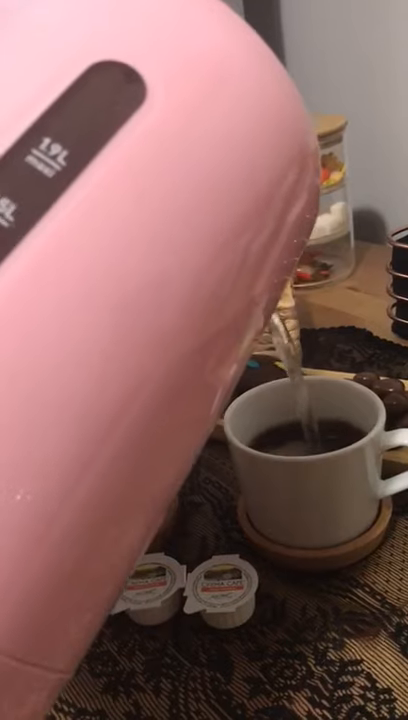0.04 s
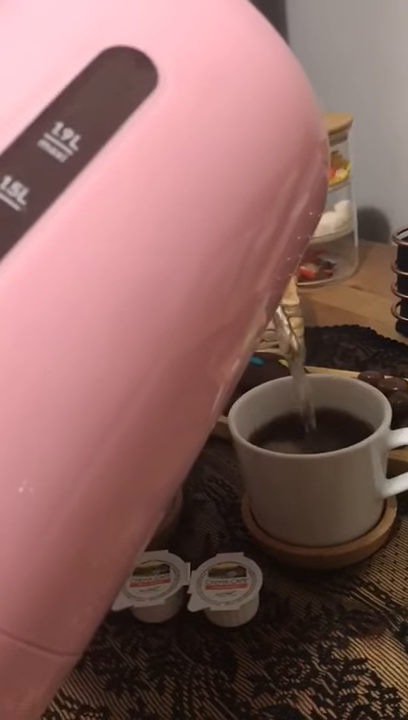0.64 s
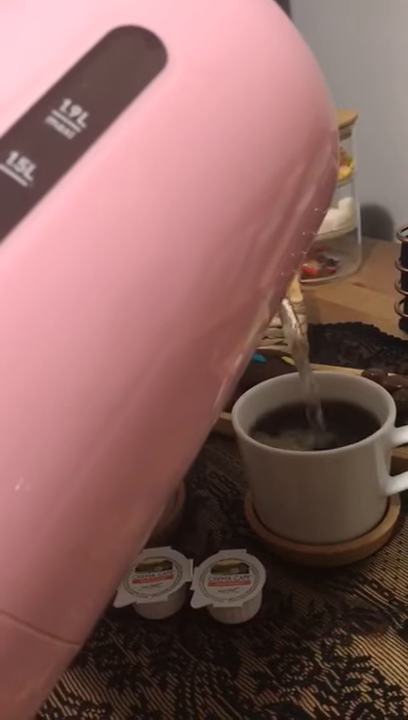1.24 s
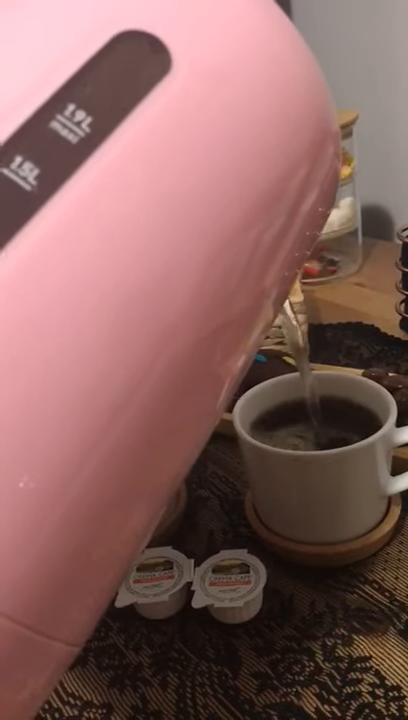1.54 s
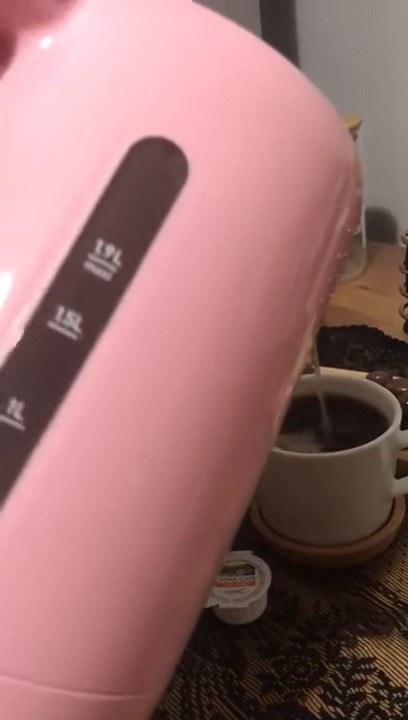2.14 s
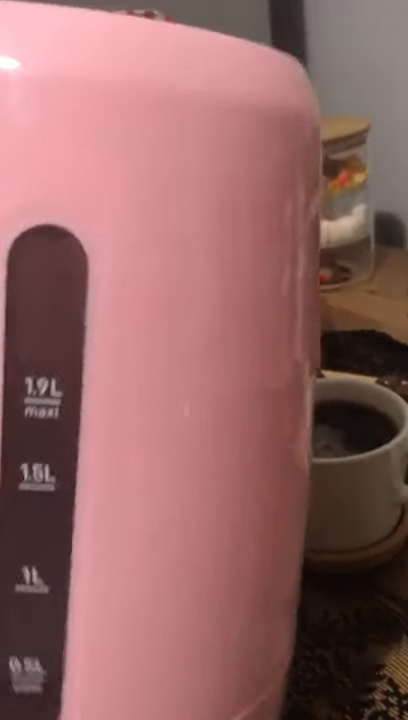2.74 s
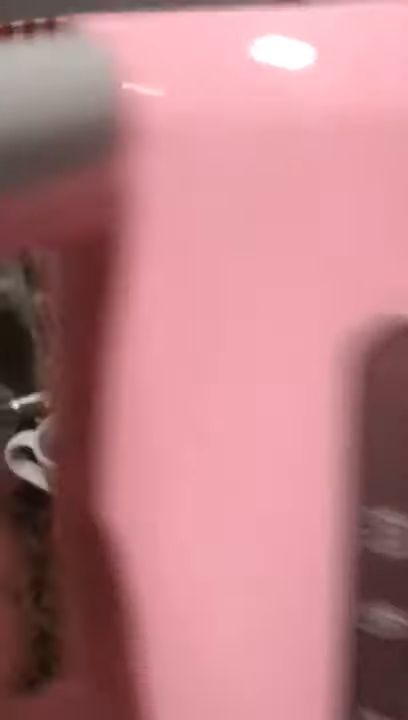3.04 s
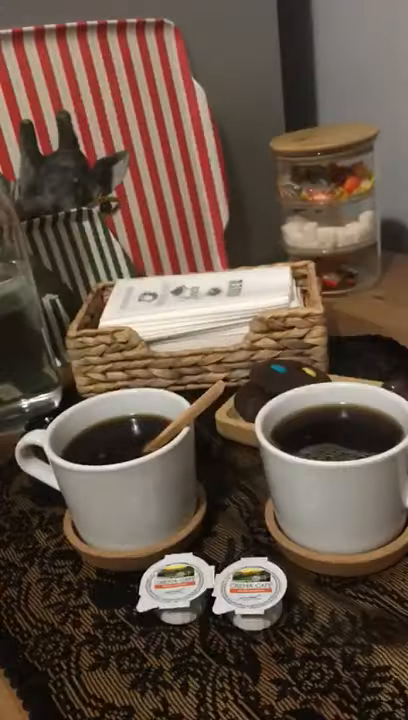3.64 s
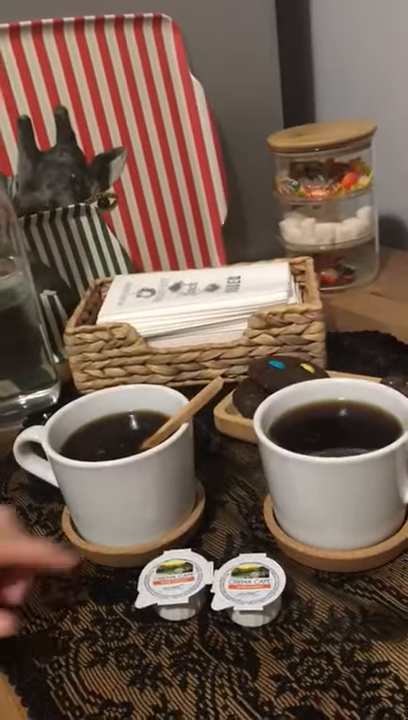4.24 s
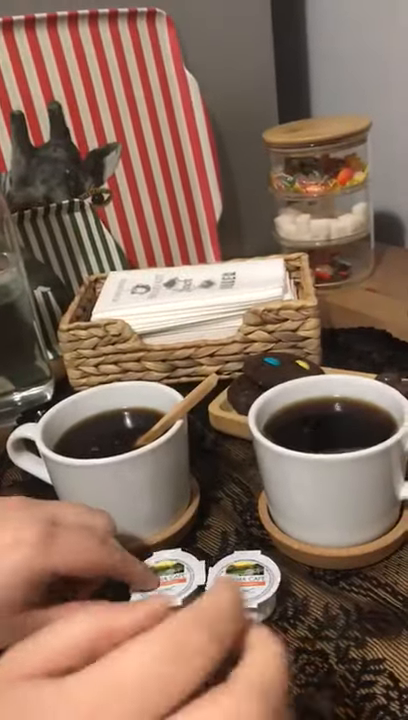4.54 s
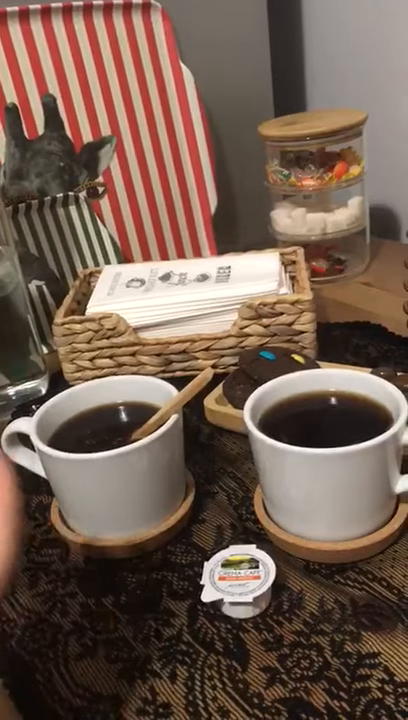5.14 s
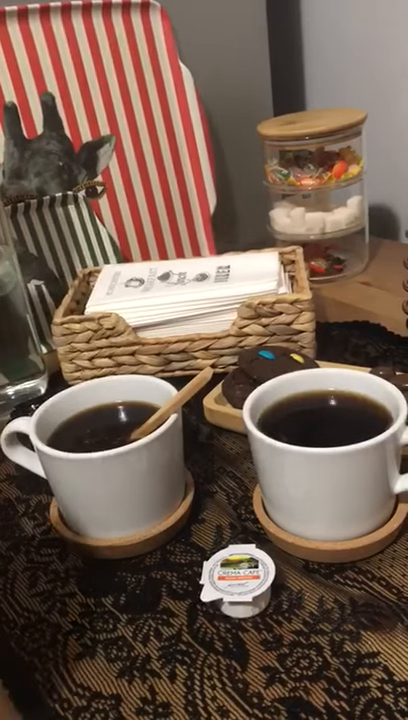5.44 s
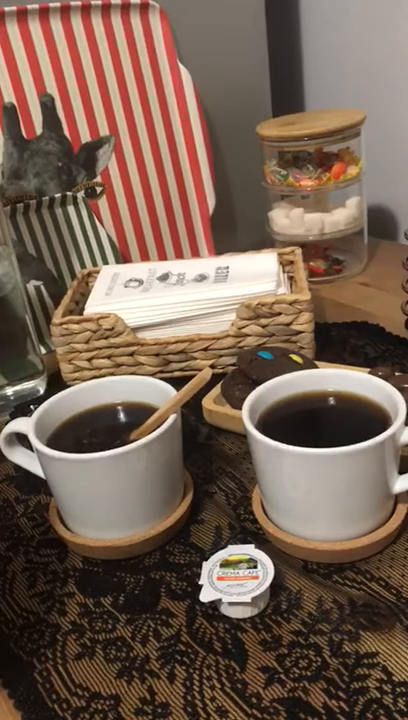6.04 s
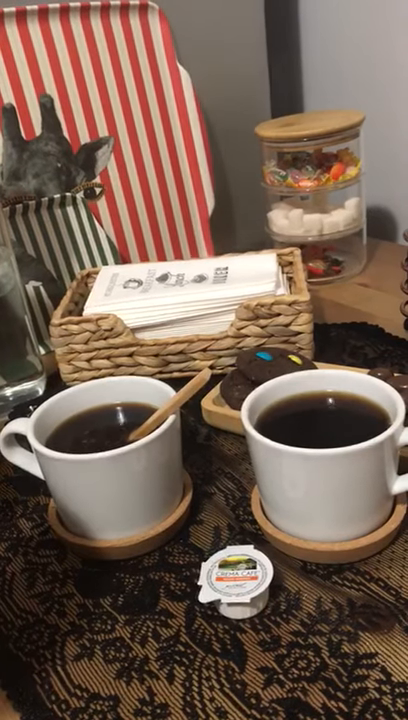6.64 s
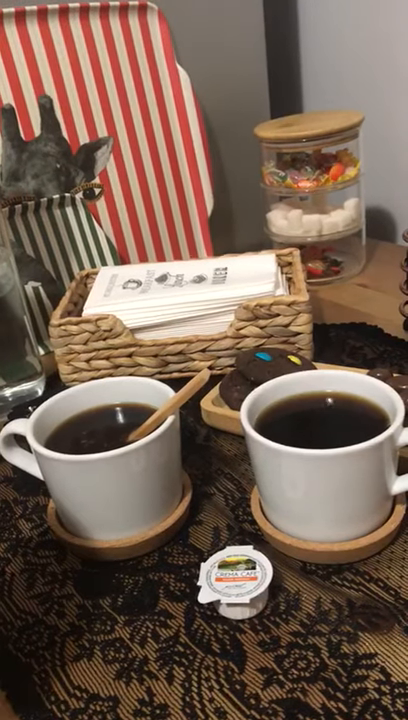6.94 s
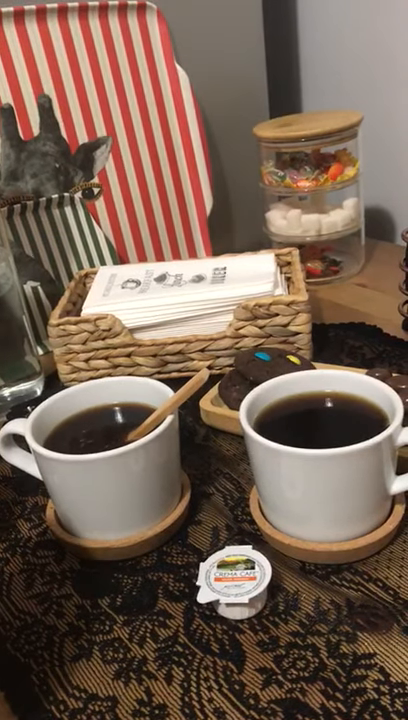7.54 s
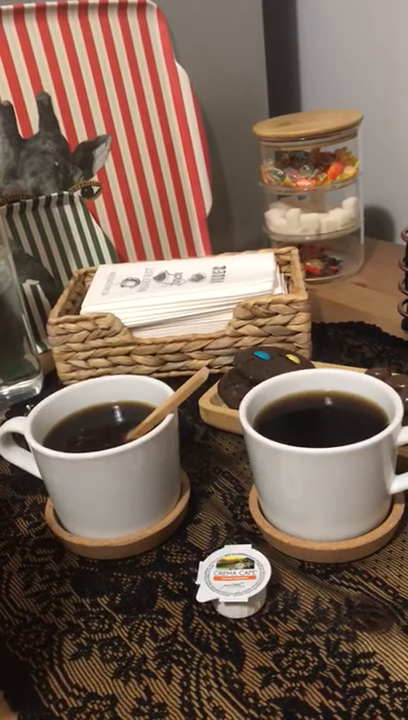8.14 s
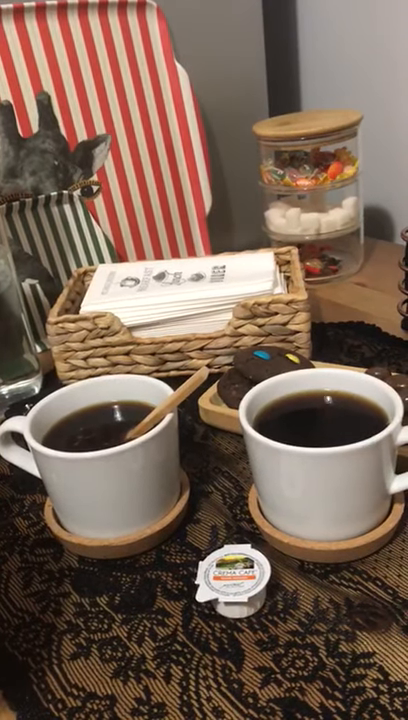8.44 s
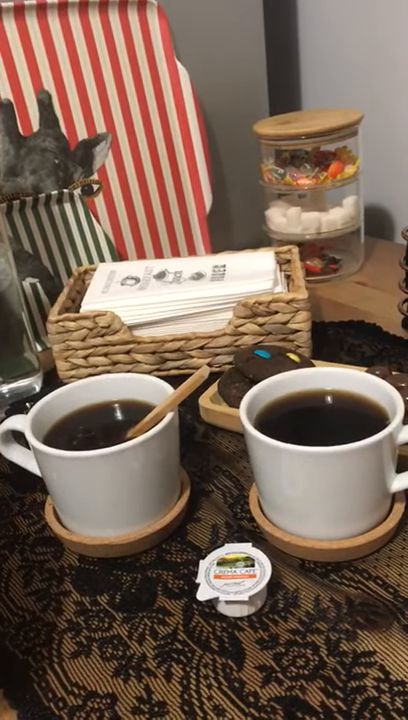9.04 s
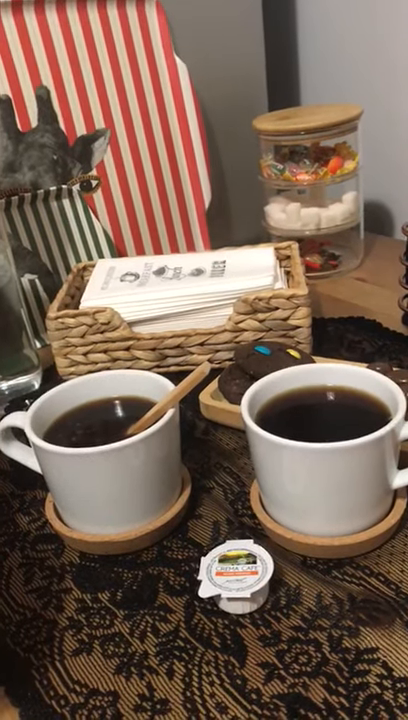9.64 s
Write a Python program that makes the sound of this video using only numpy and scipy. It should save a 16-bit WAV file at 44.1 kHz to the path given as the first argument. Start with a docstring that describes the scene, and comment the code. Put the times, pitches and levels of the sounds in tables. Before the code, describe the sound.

In a small kitchen where a fridge hums faintly, a close stream of water splats and plops into a ceramic mug. After it ends, a kettle lands on a wooden table with a thud and a second knock, and sleeves swish. Fingers then handle a small plastic creamer cup: a bright crack as the tab breaks, a crackly peel of foil, and a few fading ticks and rubs.

```python
"""Hot water runs from a kettle into a nearly full ceramic mug: it splats, plops and traps ringing bubbles.
The kettle is set down with a thud that makes the wooden table ring, and sleeves rustle.
A little plastic creamer cup is picked up and its tab is snapped. The foil lid peels back as its glue
lets go in tiny snaps, and fingers rub, creak and click on the hollow cup.
Behind it all, a fridge hums in the small kitchen."""
import sys
import numpy as np
from scipy import signal
from scipy.fft import rfft, irfft
from scipy.io import wavfile

SR = 44100
rng = np.random.default_rng(int(sys.argv[2]) if len(sys.argv) > 2 else 0)


def digitize_waveform(pressure):
    """Quantize a signal to 16-bit integers and store it at the path in sys.argv[1].

    Rows of a 2-D input are taken as channels; values are limited to [-1, 1].
    """
    field = np.atleast_2d(pressure).T
    bounded = np.clip(field, -1, 1)
    quanta = np.round(bounded * 32767).astype(np.int16)
    wavfile.write(sys.argv[1], SR, quanta)


N = 431738
TIME = np.arange(N) / SR  # seconds through the whole scene
BURST = np.arange(2048) / SR  # seconds through one short sound

# Levels in the tables are relative: the functions turn them up or down.
# The fridge's hum. Each row: pitch in Hz, level in dB.
FRIDGE_TONES = [(48.4, -65), (96.9, -67), (145.3, -60.5), (220.7, -68.5), (290.7, -71.5), (339.1, -72.5),
                (549.1, -75.5)]
# The tone colour of the room noise. Each row: frequency in Hz, level in dB.
ROOM_COLOUR = [(20, -26.5), (45, -1), (145, -3.5), (243, -10.5), (331, -10.5), (418, -18.5), (555, -15.5),
               (817, -23.5), (2820, -31), (8580, -34.5), (11100, -37.5), (12000, -48.5)]
# Faint hiss and appliance whine. Each row: pitch in Hz, width in Hz, level in dB.
HISS_BANDS = [(550, 150, -7), (3640, 11, 16), (4410, 67, 8), (6550, 450, -1.5)]
# The kitchen's echo. Each row: frequency in Hz, seconds to fade by 60 dB.
ECHO_TIMES = [(100, 0.9), (500, 0.44), (5000, 0.29), (12000, 0.25)]

# Sleeves swish most as the arm lets go of the kettle. Each row: time in seconds, level in dB.
SLEEVE_LEVELS = [(3.1, -86), (3.2, -66.5), (3.36, -62), (3.5, -66), (3.86, -59.5), (3.92, -46), (3.99, -49),
                 (4.06, -59), (4.26, -60.5), (4.45, -64), (4.61, -66), (4.82, -64.5), (4.88, -83)]
# An arm brushes the tablecloth. Each row: start in seconds, length in seconds, level in dB.
ARM_BRUSHES = [(5.05, 0.26, -59)]
# The tone colours of sleeves, tablecloth and kettle shell. Each row: frequency in Hz, level in dB.
SLEEVE_COLOUR = [(300, -23), (700, -0.5), (1350, 0), (9000, -6.5), (12000, -12)]
TABLECLOTH_COLOUR = [(100, -4), (200, 4), (800, -17), (5000, -29), (12000, -39.5)]
SHELL_COLOUR = [(500, -17), (1100, 0), (2400, -1), (10000, -26.5)]
# Kettle and hands hit the table. Each row: time in seconds, thud level in dB, thud pitch in Hz,
# clack level in dB, tick level in dB.
TABLE_BLOWS = [(2.376, -62, 130, -70, -58.5), (2.542, -47, 120, -70, -47.5), (3.276, -62, 130, -56, -51),
               (3.723, -22.5, 80, -25, -37.5), (3.979, -27.5, 90, -42, -39.5),
               (4.144, -41.5, 188, -65, -53.5), (4.691, -43.5, 138, -56, -57),
               (5.09, -43.5, 156, -49.5, -65)]
# How the table, the squeak and the scrape ring. Each row: pitch in Hz, width in Hz, level in dB.
TABLE_RINGS = [(45, 7, 7), (80, 13.5, 3), (109.9, 7.8, 15), (187.6, 16, 5.5), (274, 38, 10), (390, 71, 6.5),
               (686, 62, 6)]
SQUEAK_RINGS = [(7300, 120, -1), (8600, 140, 7), (10860, 230, 6)]
SCRAPE_RINGS = [(1300, 630, 0)]
# The kettle's foot slides as it settles. Each row: start in seconds, length in seconds, level in dB.
FOOT_SQUEAKS = [(3.76, 0.22, -60.5)]
FOOT_SCRAPES = [(3.81, 0.08, -56)]

# How the plastic cup's wall rings. Each row: pitch in Hz, width in Hz, level in dB.
CUP_RINGS = [(1510, 370, 5.5), (2200, 288, 2.5), (3260, 330, 4), (4370, 290, 1), (5910, 340, 3),
             (6870, 220, -0.5), (7940, 700, -11.5), (9500, 650, -3.5), (10950, 1200, -6.5)]
# The wall buckles. Each row: time in seconds, click level in dB, crack level in dB, crack pitch in Hz,
# pop level in dB, pop pitch in Hz.
CUP_BUCKLES = [(4.494, -60, -48, 5000, -46, 1250), (4.692, -60, -41.5, 6600, -41, 1266),
               (5.857, -38, -27, 5930, -39, 1180), (6.0826, -26, -34, 8950, -31.5, 1010),
               (6.0841, -16.5, -7.5, 6440, -27.5, 1456), (6.15, -38.5, -47, 6000, -37.5, 1170),
               (6.2446, -31.5, -31.5, 9800, -32.5, 1277), (6.422, -40.5, -44, 6500, -41.5, 1330),
               (6.4293, -58, -62, 6460, -41, 1044), (7.8304, -52, -63, 4110, -52.5, 1066),
               (8.0941, -65, -70, 3000, -48, 1220), (9.048, -44.5, -37, 4490, -53, 1310)]
# Fingernails tap or spots of glue let go. Each row: time in seconds, level in dB, pitch in Hz.
CUP_TICKS = [(4.6638, -43.5, 6300), (6.8213, -32.5, 7000), (6.967, -40, 6250), (7.0248, -36, 7400),
             (7.0632, -39, 7020), (7.122, -40.5, 7500), (7.358, -41, 8900), (7.4623, -39.5, 6810),
             (7.4923, -36, 5000), (7.6987, -41, 7300), (7.73, -42.5, 4840), (7.777, -40.5, 5400),
             (7.9276, -41, 5900), (7.995, -43, 7500), (8.1707, -44.5, 3500), (8.764, -52.5, 4590),
             (9.5776, -55, 5000)]
# Fingers slide, grip and pull the lid, which keeps creeping off between pulls.
# Each row: start in seconds, length in seconds, level in dB.
FINGER_RUBS = [(4.63, 0.05, -67.5), (8.1, 0.39, -69.5), (8.23, 0.059, -71.5), (8.52, 0.096, -64.5),
               (8.8, 0.065, -71.5), (9.12, 0.1, -66.5), (9.62, 0.05, -71)]
GRIP_CREAKS = [(5.63, 0.026, -52), (5.674, 0.015, -55), (9.033, 0.019, -56.5), (9.243, 0.019, -57)]
LID_PULLS = [(6.752, 0.099, -46), (6.99, 0.1, -59), (7.42, 0.037, -56.5)]
LID_CREEP = [(6.88, 0.63, -72.5)]
# The tone colours of skin on plastic and of foil. Each row: frequency in Hz, level in dB.
SKIN_COLOUR = [(900, -12), (1700, -4), (3000, -1.5), (5200, -6.5), (12000, -19)]
FOIL_COLOUR = [(240, -26), (450, 1.5), (1800, -2.5), (4500, 0.5), (10000, -2), (12000, -8)]

# The stream thins, then spatters as the kettle is raised. Each row: time in seconds, level in dB.
STREAM_LEVELS = [(0, -53), (1.62, -54), (1.8, -60), (2.02, -56), (2.07, -52), (2.201, -48.5), (2.27, -77)]
# The biggest lumps of water, bubbles and flying drops.
# Each row: time in seconds, level in dB, base pitch in Hz.
BIG_PLOPS = [(0.0084, -43.5, 1504), (0.2005, -45, 1820), (0.2389, -44, 1810), (0.2668, -41, 1720),
             (0.404, -44, 1490), (0.5359, -39.5, 1740), (0.562, -50.5, 1300), (0.6517, -43, 1900),
             (0.7756, -44.5, 1800), (0.8365, -37.5, 1840), (0.897, -48, 1770), (1.081, -48.5, 1850),
             (1.109, -48, 1420), (1.1631, -44.5, 1800), (1.1925, -39, 1500), (1.2093, -42.5, 1690),
             (1.242, -43, 1880), (1.2905, -48, 1900), (1.394, -49.5, 1485), (1.4224, -40, 1270),
             (1.4557, -40, 1460), (1.5731, -44.5, 1750), (1.6224, -35, 1880), (1.678, -43.5, 1500),
             (1.8164, -43, 1290), (1.9521, -39.5, 2560), (2.0138, -40.5, 2120), (2.0436, -37, 1860),
             (2.0621, -36.5, 2080), (2.117, -39, 2530)]
BIG_BUBBLES = [(0.008, -36, 1600), (0.252, -40.5, 1596), (0.584, -49, 940)]
BIG_DROPS = [(0.315, -39.5, 11400), (0.816, -42.5, 6040), (0.995, -45, 6100), (1.079, -52.5, 6200),
             (1.131, -43.5, 8850), (1.243, -40, 4840), (1.591, -38, 9450), (1.949, -40, 6000),
             (2.0433, -36.5, 5600), (2.1063, -36.5, 7700)]
# The tone colours of the fizzing water and the spray. Each row: frequency in Hz, level in dB.
FIZZ_COLOUR = [(250, -14), (430, 3), (720, -11.5), (1600, 3), (3500, -5), (4500, -5.5), (8000, -13)]
SPRAY_COLOUR = [(3000, 7), (5200, -3), (6150, 14), (7700, -18), (9200, 9.5), (13000, -13)]
# How the air above the water rings. Each row: pitch in Hz, width in Hz, level in dB.
MUG_RINGS = [(937, 140, 4.5), (1540, 400, -8.5), (1821, 34, 8), (2580, 110, 5.5), (3400, 200, 2.5)]

TICK_LEAD_S = 0.0122  # an edge touches the table this long before the weight lands


def from_db(db):
    """Turn decibels into a number to multiply by."""
    return 10 ** (np.asarray(db) / 20)


def rms_one(x):
    """Scale a sound so its average strength (rms) is one."""
    return x / np.sqrt(np.mean(x ** 2) + 1e-20)


def peak_one(x):
    """Scale a sound so its biggest swing is one."""
    return x / np.max(np.abs(x))


def level(rows):
    """Join (seconds, dB) points into a volume curve, silent before and after."""
    times, dbs = np.transpose(rows)
    return from_db(np.interp(TIME, times, dbs, left=-150, right=-150))


def strokes(rows, attack_s, release_s):
    """A volume curve for sliding movements: each swells, then dies away once its length is up."""
    gain = 0
    for start, length, db in rows:
        swell = np.clip((TIME - start) / attack_s, 0, 1)
        fade = np.exp(-np.clip((TIME - start - length) / release_s, 0, 20))
        gain = gain + from_db(db) * swell * fade
    return gain


def at_hz(rows, hz):
    """Read between a table's rows, with octaves evenly spaced."""
    pitches, values = np.transpose(rows)
    return np.interp(np.log(np.maximum(hz, 1)), np.log(pitches), values)


def add(out, s, sound):
    """Mix in a short sound at s seconds."""
    start = max(0, int(s * SR))
    out[start:start + len(sound)] += sound[:max(0, N - start)]


def drift(per_s):
    """Wander at random around zero, typically by about one."""
    points = rng.standard_normal(4096)
    return rms_one(np.interp(TIME * per_s, np.arange(len(points)), points))


def keep_band(x, order, hz, kind):
    """Keep the lows, the highs or a band; a higher order cuts more sharply."""
    return signal.sosfilt(signal.butter(order, hz, kind, fs=SR, output="sos"), x)


def colour(x, spectrum, size=8192):
    """Give a sound a tone colour and an average strength of one."""
    gains = from_db(at_hz(spectrum, np.arange(size // 2 + 1) * SR / size))
    cepstrum = irfft(np.log(gains))
    # folding this in half makes the filter ring only after a click, never before
    cepstrum[1:size // 2] *= 2
    cepstrum[size // 2 + 1:] = 0
    response = irfft(np.exp(rfft(cepstrum)))
    return rms_one(signal.oaconvolve(x, response)[:N])


def resonate(x, rings):
    """Let a sound ring at each listed pitch; narrow widths ring longer."""
    out = 0
    for hz, width, db in rings:
        r = np.exp(-np.pi * width / SR)
        feedback = [1, -2 * r * np.cos(2 * np.pi * hz / SR), r * r]
        out = out + from_db(db) * (1 - r * r) / 2 * signal.lfilter([1, 0, -1], feedback, x + 1e-18)
    return out


def grains(per_s, spread_db):
    """Random clicks, many small and a few large."""
    sizes = from_db(spread_db * np.minimum(rng.exponential(1, N), 4)) * rng.choice([-1, 1], N)
    return sizes * (rng.random(N) < per_s / SR)


def crack(decay_s):
    """A sudden break, then a dying scatter of tiny slips, about equally strong at all pitches."""
    burst = 0.24 * rng.standard_normal(len(BURST)) * np.exp(-BURST / decay_s)
    burst[0] = 1
    evened = irfft(np.exp(1j * np.angle(rfft(burst))))
    return evened * np.exp(-BURST / (10 * decay_s))


def background(waver_db=2.5, wobble=0.95):
    """A fridge's hum wavers over soft room noise and hiss."""
    hum = 0
    for hz, db in FRIDGE_TONES:
        gain = from_db(db - 0.5 + waver_db * drift(7.3)) * np.sqrt(2)
        hum = hum + gain * np.sin(2 * np.pi * (hz * TIME + rng.random()) + wobble * drift(3.9))
    air = from_db(-59) * colour(rng.standard_normal(N), ROOM_COLOUR)
    hiss = from_db(-79) * rms_one(resonate(rng.standard_normal(N), HISS_BANDS))
    return hum + air + hiss


def kitchen_echo(x, first_echo_s=0.0071):
    """Sound bounces around the room, and the high pitches die first."""
    t = TIME[:SR // 2]
    edges = np.geomspace(50, 14000, 9)
    tail = 0
    for low, high in zip(edges, edges[1:]):
        band = keep_band(rng.standard_normal(len(t)), 2, [low, high], "band")
        tail = tail + band * np.exp(-np.log(1000) * t / at_hz(ECHO_TIMES, np.sqrt(low * high)))
    tail = tail * (t > first_echo_s)
    return signal.oaconvolve(x, tail / np.sqrt(np.sum(tail ** 2)))[:N]


def sleeves():
    """Cloth fibres rub together, louder as the arm moves faster; an arm brushes the tablecloth."""
    speed = level(SLEEVE_LEVELS) * from_db(drift(32))
    swish = speed * colour(grains(9000, 3.6), SLEEVE_COLOUR)
    brushing = from_db(5.5) * strokes(ARM_BRUSHES, attack_s=0.027, release_s=0.132)
    return swish + brushing * colour(grains(1500, 1.7), TABLECLOTH_COLOUR)


def contacts(tick_hz=1190, clack_hz=370, clack_lead_s=0.00797, gap_s=0.02916, loss_db=6, rise=1.09):
    """List (seconds, dB, Hz) for each blow: a tick, a clack, a thud and two lighter, higher bounces."""
    rows = []
    for s, thud_db, hz, clack_db, tick_db in TABLE_BLOWS:
        rows += [(s - TICK_LEAD_S, tick_db, tick_hz), (s - clack_lead_s, clack_db, clack_hz)]
        for k in range(3):
            rows.append((s + k * gap_s * rng.uniform(0.93, 1.07), thud_db - k * loss_db, hz * rise ** k))
    return rows


def knocks(ring_db=-4.5, rattle_db=-6.5, rattle_s=0.018):
    """Each contact is one push and rebound; the table rings and loose things on it shiver."""
    push, rattle = np.zeros((2, N))
    for s, db, hz in contacts():
        x = 2 * np.pi * hz * (BURST - BURST.mean())
        add(push, s - BURST.mean(), from_db(db) * peak_one(-x * np.exp(-x * x / 2)))
        shiver = rms_one(keep_band(rng.standard_normal(len(BURST)), 3, [hz * 0.4, hz * 1.23], "band"))
        add(rattle, s, from_db(db + rattle_db) * shiver * np.exp(-BURST / rattle_s))
    return push + from_db(ring_db) * resonate(push, TABLE_RINGS) + rattle


def kettle_shell(decay_s=0.013):
    """The kettle's plastic shell chatters briefly after each first touch."""
    touches = np.zeros(N)
    for s, _, _, _, tick_db in TABLE_BLOWS:
        add(touches, s - TICK_LEAD_S, from_db(tick_db - 6) * np.exp(-BURST / decay_s))
    return touches * colour(rng.standard_normal(N), SHELL_COLOUR)


def kettle_slide():
    """The kettle's foot squeaks at a few high pitches and scrapes as it settles."""
    squeak = rms_one(resonate(rng.standard_normal(N), SQUEAK_RINGS))
    squeak *= strokes(FOOT_SQUEAKS, attack_s=0.015, release_s=0.04)
    scrape = rms_one(resonate(resonate(grains(3000, 2.8), SCRAPE_RINGS), SCRAPE_RINGS))
    return squeak + scrape * strokes(FOOT_SCRAPES, attack_s=0.05, release_s=0.033)


def fingers(hollow_hz=1400, creak_hz=3600):
    """Sliding skin stirs the cup's hollow, whose note shifts; a tighter grip makes the wall creak."""
    slips = grains(2200, 3.7) * from_db(drift(40))
    note = np.sin(2 * np.pi * np.cumsum(hollow_hz * (1 + 0.09 * drift(9))) / SR)
    hollow = from_db(-1) * rms_one(note * keep_band(slips, 2, 230, "low"))
    skin = from_db(-1.5) * colour(slips, SKIN_COLOUR)
    sliding = strokes(FINGER_RUBS, attack_s=0.037, release_s=0.017) * (skin + hollow)
    catches = resonate(grains(2400, 1.6), [(creak_hz, creak_hz, 0)])
    grip = from_db(1) * strokes(GRIP_CREAKS, attack_s=0.023, release_s=0.0057)
    return sliding + grip * rms_one(resonate(catches, CUP_RINGS))


def lid_peel(uneven_db=1.5, jerk_db=1.5, wall_db=-27):
    """Glue lets go in thousands of tiny snaps a second; the foil crinkles and the cup rings along."""
    tearing = rms_one(grains(4000, 1.5) * from_db(uneven_db * drift(90)))
    pull = strokes(LID_PULLS, attack_s=0.023, release_s=0.046) * from_db(jerk_db * drift(45))
    creep = from_db(6.5) * strokes(LID_CREEP, attack_s=0.03, release_s=0.051)
    force = pull * tearing + creep * rms_one(grains(430, 4.7))  # creeping snaps come one by one
    wall = from_db(wall_db) * rms_one(resonate(force, CUP_RINGS))
    return np.std(force) * (colour(force, FOIL_COLOUR) + wall)


def snap(db, hz, width_hz, scatter_s, raw_db):
    """One break in the plastic, centred on hz and coloured by the cup's wall."""
    force = resonate(crack(scatter_s), [(hz, width_hz, 0)])
    force = resonate(force, [(hz, 2 * width_hz, 0)])
    return from_db(db) * peak_one(resonate(force, CUP_RINGS) + from_db(raw_db) * force)


def cup_snaps(click_hz=2630):
    """The thin wall clicks and cracks brightly; fingernails and spots of glue give lighter ticks."""
    out = np.zeros(N)
    for s, click_db, crack_db, crack_hz, _, _ in CUP_BUCKLES:
        add(out, s, snap(click_db, click_hz, width_hz=2350, scatter_s=0.0042, raw_db=-1))
        add(out, s, snap(crack_db + 2.5, crack_hz, width_hz=4900, scatter_s=0.0022, raw_db=-3.5))
    for s, db, hz in CUP_TICKS:
        add(out, s, snap(db, hz, width_hz=5500, scatter_s=0.0025, raw_db=-3))
    return keep_band(out, 4, 850, "high")  # so small a cup gives off no bass


def cup_pops(lag_s=0.0005, swell_s=0.0021, tremble=0.061, octave_db=-20.5):
    """Just after the wall buckles, the hollow gives a short pop, unsteady as the wall moves."""
    out = np.zeros(N)
    swell = peak_one(BURST * np.exp(-BURST / swell_s))
    for s, _, _, _, db, hz in CUP_BUCKLES:
        phase = 2 * np.pi * hz * BURST + np.cumsum(rng.normal(0, tremble, len(BURST)))
        note = np.sin(phase) + from_db(octave_db) * np.sin(2 * phase)
        add(out, s + lag_s, from_db(db) * swell * note)
    return out


def drumming():
    """The falling stream faintly shakes the table through the mug."""
    thumps = resonate(grains(200, 8.5), [(94, 35, 0)])
    return from_db(-7) * level(STREAM_LEVELS) * rms_one(resonate(thumps, TABLE_RINGS))


def spray(rise_db_per_s=1.5, flicker_db=2):
    """Big drops spit off the surface; a fine spray of ringing droplets grows as the mug fills."""
    spits = np.zeros(N)
    for s, db, hz in BIG_DROPS:
        add(spits, s, from_db(db) * peak_one(resonate(crack(0.0023), [(hz, 2600, 0)])))
    droplets = sum(resonate(grains(60, 4.5), [(hz, 1200, 0)]) for hz in np.linspace(4000, 11500, 10))
    last_spatter_s = STREAM_LEVELS[-2][0]
    flow = strokes([(0.0076, last_spatter_s, -74.5)], attack_s=0.0086, release_s=0.0086)
    flow *= from_db(rise_db_per_s * TIME - flicker_db * drift(25.64))
    return spits + flow * colour(droplets, SPRAY_COLOUR)


def bubble(hz, ring_s, rise_per_s=3.3):
    """Trapped air rings for a moment, its pitch creeping up as it nears the surface."""
    return np.sin(2 * np.pi * hz * BURST * (1 + rise_per_s * BURST / 2)) * np.exp(-BURST / ring_s)


def trapped_air(gulp_hz=430, gulp_s=0.00807, within_s=0.025):
    """Each dent in the water closes with a gulp and drags down two bubbles; a few big ones stand out."""
    out = np.zeros(N)
    for s, db, hz in BIG_PLOPS:
        gulp = bubble(gulp_hz * 2 ** rng.normal(0, 0.064), gulp_s)
        add(out, s + gulp_s / 2, from_db(db - 7) * gulp)
        for delay, pitch in rng.random((2, 2)):
            add(out, s + within_s * delay, from_db(db - 12) * bubble(hz * 2 ** (pitch - 0.5), 0.0029))
    swell = 1 - np.exp(-BURST / 0.00083)
    for s, db, hz in BIG_BUBBLES:
        add(out, s, from_db(db) * peak_one(bubble(hz, ring_s=0.0019) * swell))
    return out


def plop(hz, fall_s, ring_s, tremble=0.16, open_s=0.00031):
    """A dent opens in the water: its note swells, drops as the dent grows, and trembles with its wall."""
    phase = 2 * np.pi * hz * fall_s * np.log1p(BURST / fall_s)
    phase += np.cumsum(rng.normal(0, tremble, len(BURST)))
    return peak_one(np.sin(phase) * np.exp(-BURST / ring_s) * (1 - np.exp(-BURST / open_s)))


def pour(ring_s=0.0025, patter_hz=1550, patter_count=620, fill_loss_db_per_s=1.5):
    """Big plops and splats, a patter of small bubbles and fine fizz all ring in the mug."""
    big, patter = np.zeros((2, N))
    end_s = STREAM_LEVELS[-1][0]
    for s, db, hz in BIG_PLOPS:
        add(big, s, from_db(db - 1.4) * plop(hz * 1.36, fall_s=0.00278, ring_s=ring_s))
        splat = peak_one(resonate(crack(ring_s), [(hz, 2200, 0)]))
        add(big, s, from_db(db + 1) * splat)
    for when, softness, pitch in rng.random((patter_count, 3)):
        blip = plop(patter_hz * 2 ** (1.5 * pitch ** 2), fall_s=0.056, ring_s=0.0036 / (1 + pitch))
        add(patter, when * end_s, from_db(-16 * softness) * blip)
    patter = rms_one(patter) * np.sqrt(end_s / TIME[-1])  # strength one while the water runs
    fizz = colour(grains(2200, 7.7), FIZZ_COLOUR)
    gurgle = level(STREAM_LEVELS) * (from_db(-7.5) * patter + from_db(-9.5) * fizz)
    water = big + trapped_air() + gurgle
    # the air above the water rings less as the mug fills
    mug = from_db(-7 - fill_loss_db_per_s * TIME) * resonate(water, MUG_RINGS)
    return 0.59 * water + mug


def scene():
    """Mix it all. Everything happens within arm's reach, so the echo stays faint."""
    water = pour() + spray()
    table = knocks() + kettle_shell() + kettle_slide() + drumming()
    cup = cup_snaps() + lid_peel() + fingers()
    pops = cup_pops()
    to_room = from_db(-11) * water + from_db(-13) * table + from_db(-12.5) * cup + from_db(-12) * pops
    return (water + table + cup + pops + kitchen_echo(to_room) + sleeves() + background())[None, :]


def record(dry, bass_hz=36, top_hz=12050):
    """The microphone drops the deepest bass; the highest treble is cut steeply."""
    thinned = keep_band(dry, 5, bass_hz, "high")
    return signal.sosfilt(signal.ellip(10, 0.3, 80, top_hz, fs=SR, output="sos"), thinned)


dry = scene()
out = record(dry)
digitize_waveform(out)
```